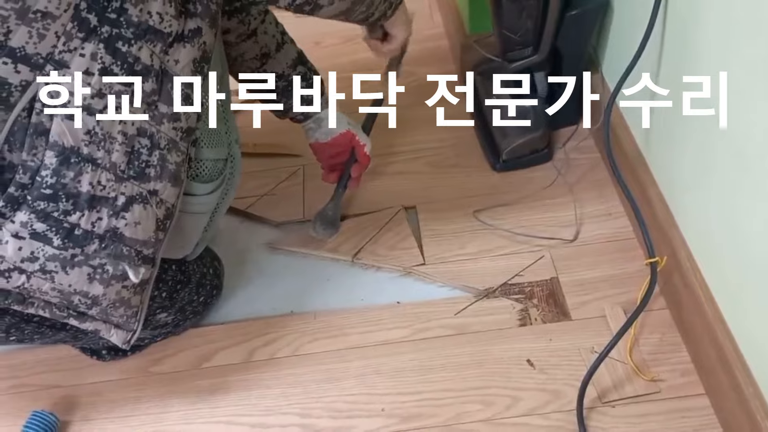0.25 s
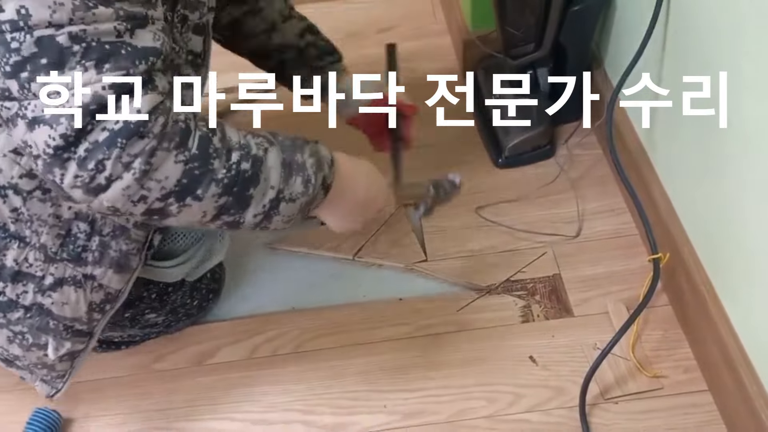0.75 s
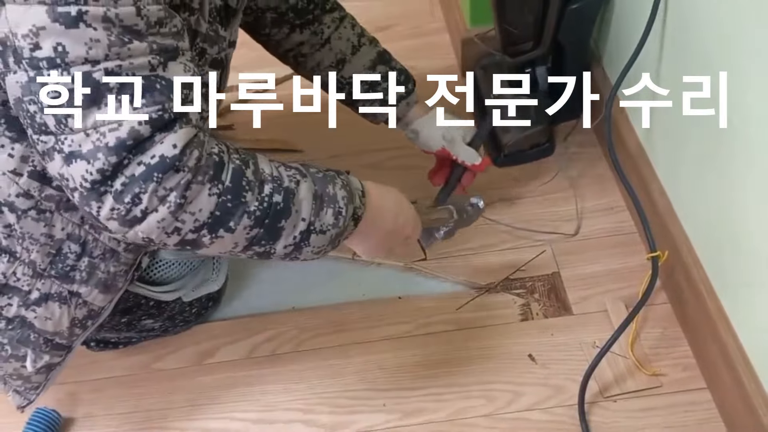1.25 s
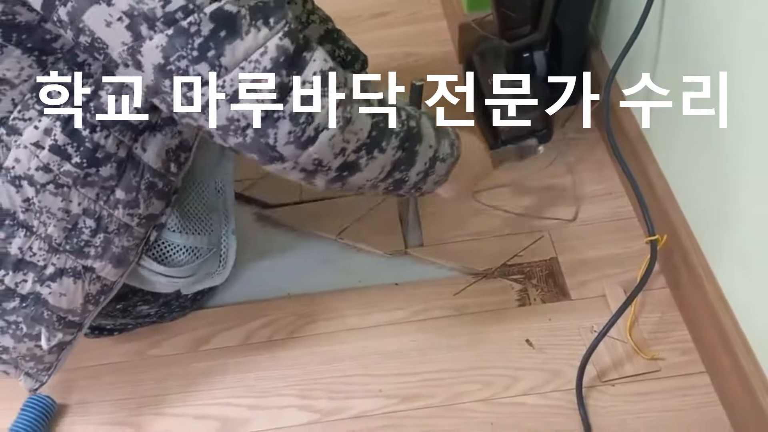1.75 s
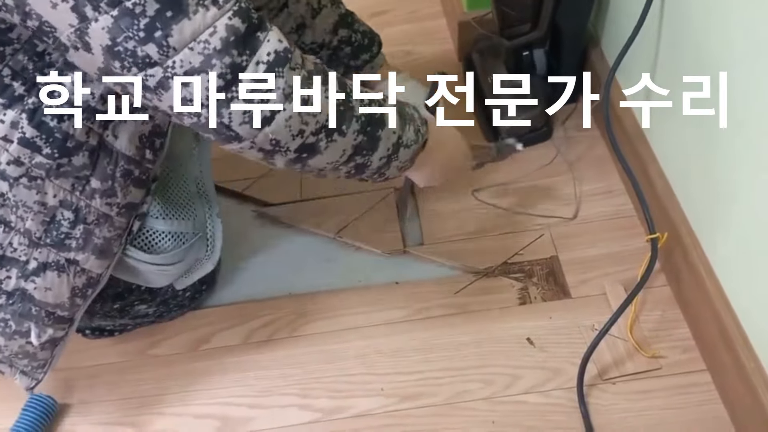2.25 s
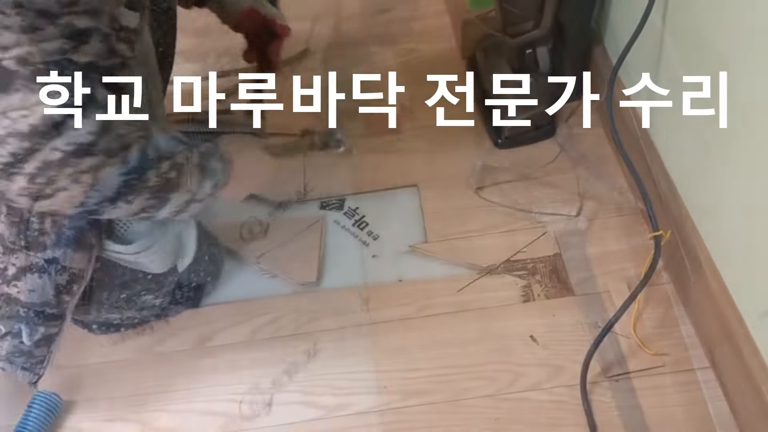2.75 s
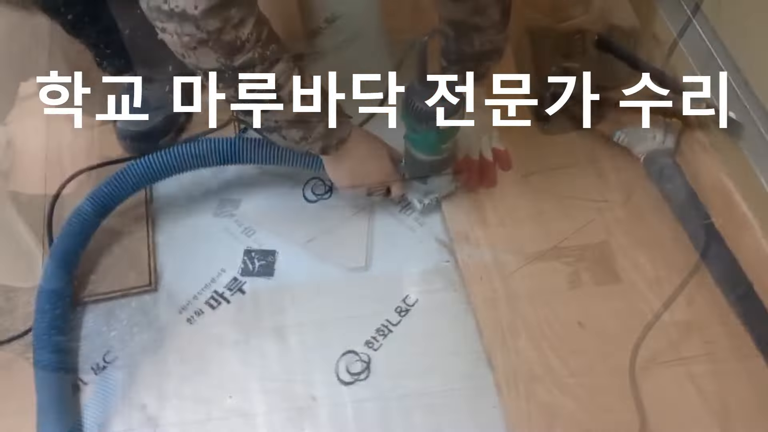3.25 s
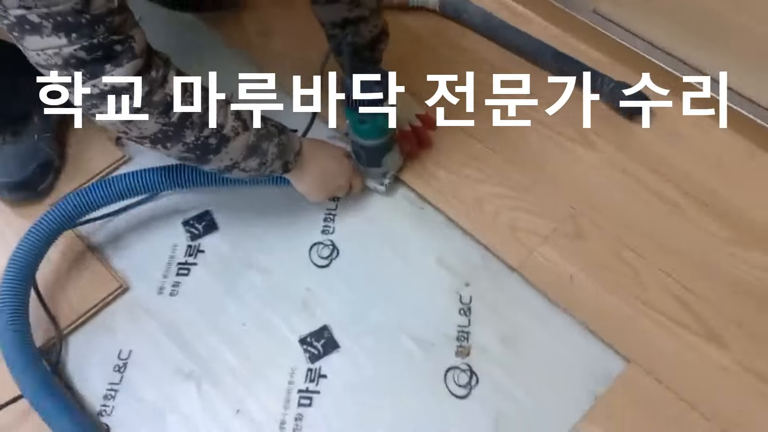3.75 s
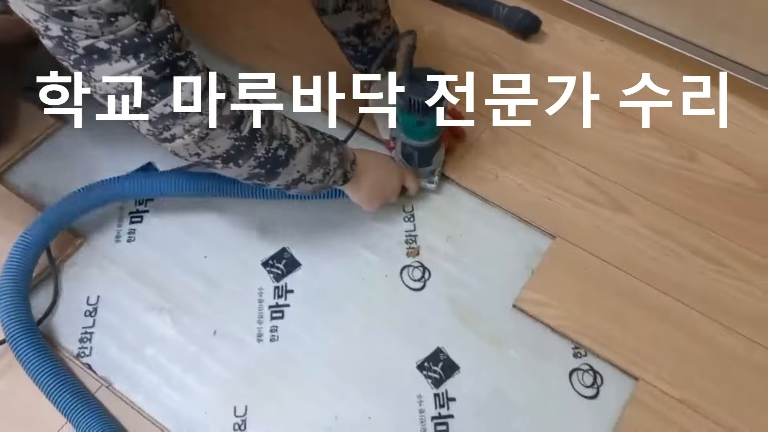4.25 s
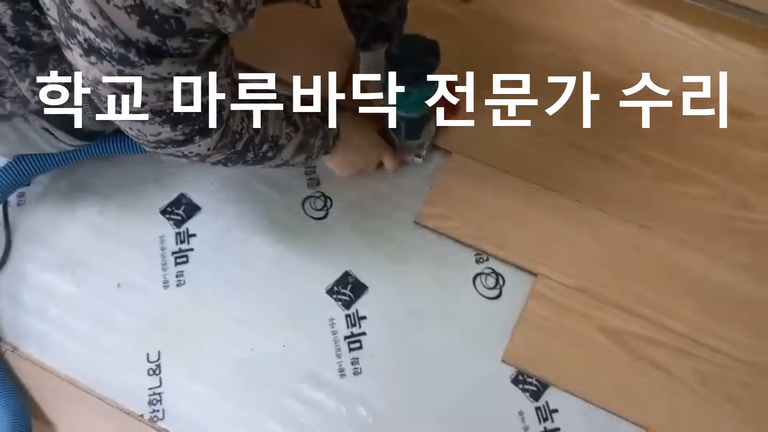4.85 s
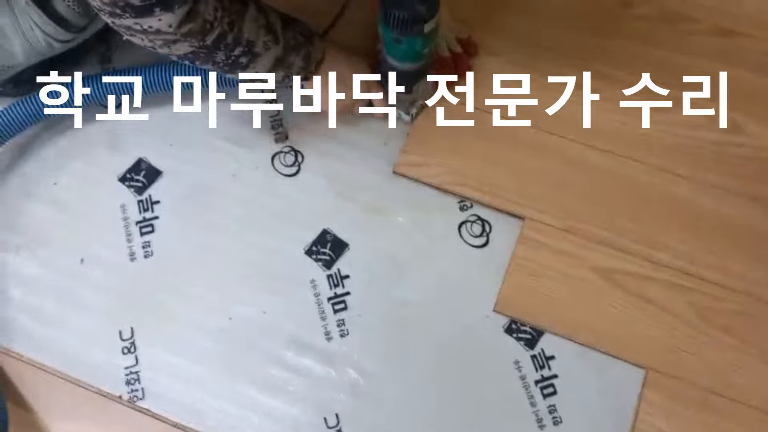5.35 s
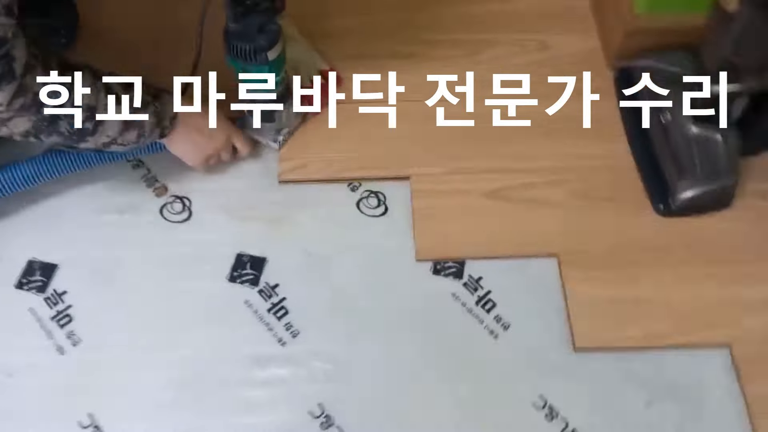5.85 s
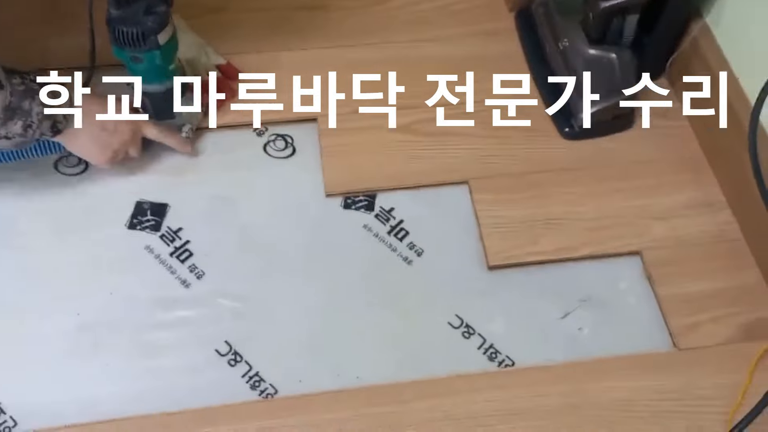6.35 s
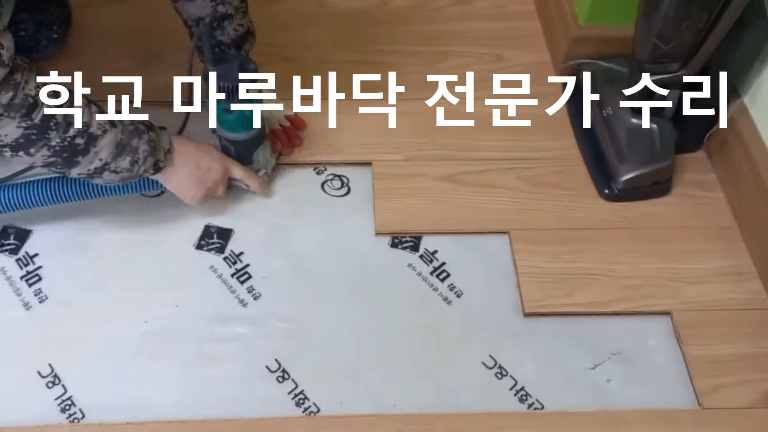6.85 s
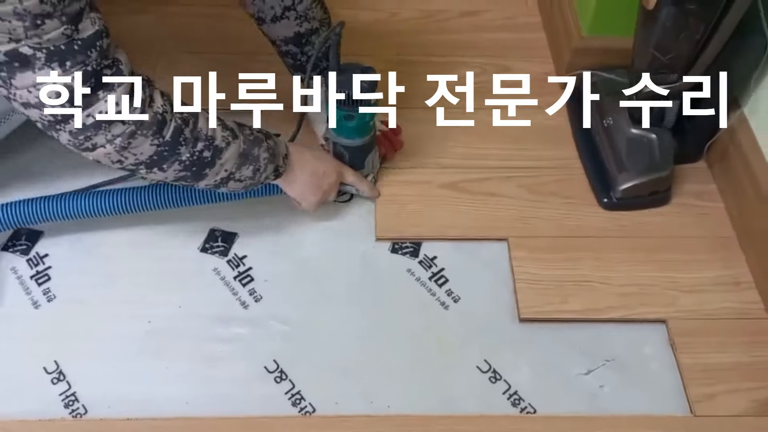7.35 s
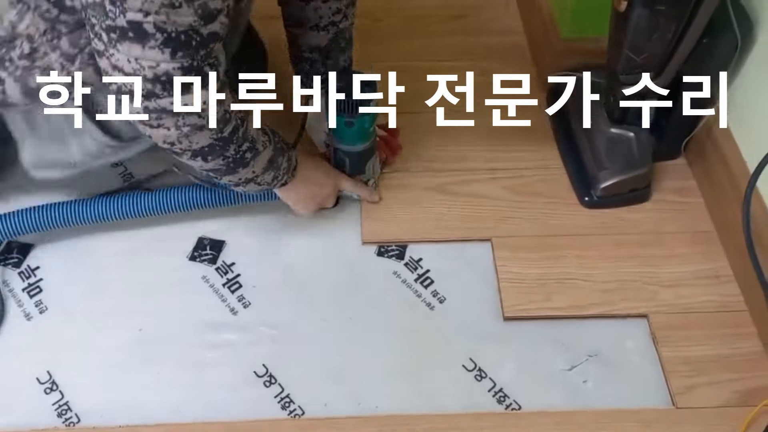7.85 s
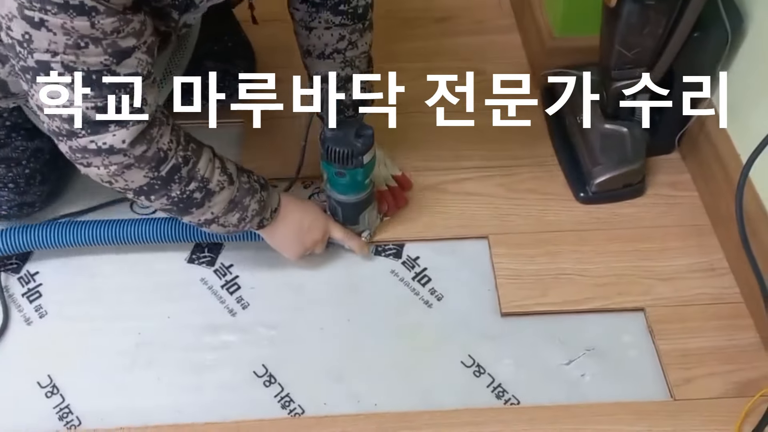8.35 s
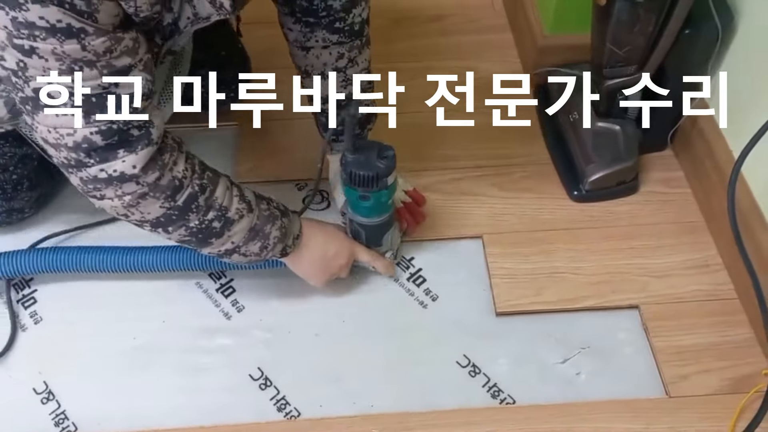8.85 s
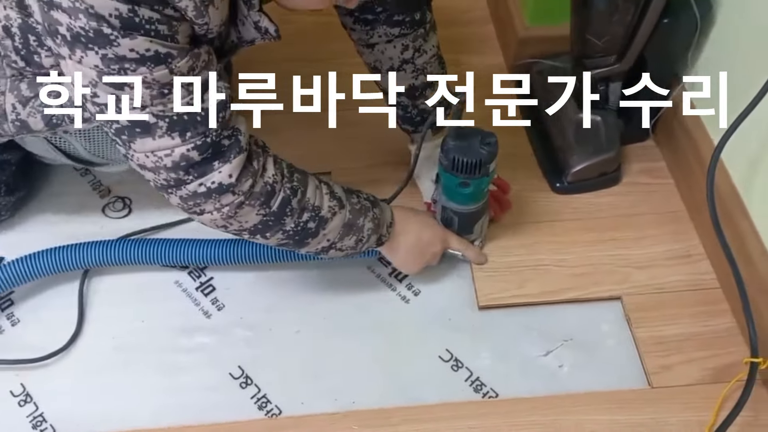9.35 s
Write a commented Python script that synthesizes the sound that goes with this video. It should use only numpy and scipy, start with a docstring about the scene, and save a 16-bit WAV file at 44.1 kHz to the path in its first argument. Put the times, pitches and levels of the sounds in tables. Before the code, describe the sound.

Close stereo sound in a bare indoor room with a short, bright echo. From 0 to 0.35 s a hammer hits a steel chisel in rapid, hard knocks, with dry wood crack and brief metallic ring, the hand tools leaning left. At 0.6 s the chisel edge ticks and scrapes sharply. From 0.9 to 1.45 s there is near silence with faint offcut knocks, sliding, and tiny steel squeaks. Loud prying cracks come at about 1.7, 1.9 and 2.4 s, woody with damped steel. From 2.6 s a trim router and vacuum fade in, reaching full level by 3.8 s. The router's nasal whine around 450 Hz wavers, sags under load and rises near 7 and 8.8 s, with shifting overtones and a fine bright cutting buzz. Steady vacuum hum and broad rushing air continue underneath until the cut-off near 9.6 s.

```python
"""Chisel, router and vacuum in a bare room

To the left a floor layer hammers a steel chisel into wooden boards, shifts the tool and prises pieces loose.
Each blow is a chattering contact that rings steel and boards; stick-slip noise makes the scrapes between.
Then a trim router and the vacuum cleaner on its hose fade in: shaft harmonics sag as the bit bites,
the cutter clicks once a turn, the motor hums, and banded noise makes the rushing air."""
import sys
import numpy as np
from scipy import signal
from scipy.fft import rfft, irfft, next_fast_len
from scipy.io import wavfile
from scipy.ndimage import uniform_filter1d

SR = 44100
rng = np.random.default_rng(int(sys.argv[2]) if len(sys.argv) > 2 else 0)


def transcribe(u):
    """Save the signal u as a 16-bit wav file named by the first command-line argument.

    u: samples, shape (n,) or (channels, n), limited to [-1, 1]; the rate is SR.
    q: integer samples, one column per channel.
    """
    v = np.clip(np.atleast_2d(u).T, -1, 1)
    q = np.round(v * 32767).astype(np.int16)
    wavfile.write(sys.argv[1], SR, q)


N = 423786
T = np.arange(N) / SR
STEP = 64  # samples between control points
RIGHT_LATE = 14  # samples by which machine noise reaches the right ear late

# resonances of loose wood: f/Hz, width/Hz, level/dB
OFFCUT = [(209, 55, 4.5), (328, 137, 0), (500, 260, 7), (800, 220, -8), (1115, 200, 4)]


def undb(db):
    """Gain of a dB value."""
    return 10 ** (np.asarray(db, float) / 20)


def unit(x):
    """Scaled to rms 1."""
    return x / np.sqrt(np.mean(x ** 2))


def unit_onset(x):
    """Scaled to rms 1 over the first 20 ms."""
    return x / np.sqrt(np.mean(x[:, :SR // 50] ** 2))


def columns(table, off=-200.):
    """Rows joined by straight lines in time; off outside, but a table reaching the end holds its last value."""
    s, *cols = np.transpose(table)
    reaches_end = s[-1] > T[-1] - .05
    return [np.interp(T, s, c, off, c[-1] if reaches_end else off) for c in cols]


def over_hz(table, size):
    """A (Hz, value) table on the bins of a transform, joined over log frequency."""
    hz, value = np.transpose(table)
    bins = np.fft.rfftfreq(size, 1 / SR)
    return np.interp(np.log(bins + 1), np.log(hz), value)


def colour(x, table):
    """Shaped by a (Hz, dB) spectrum."""
    size = x.shape[-1]
    return irfft(rfft(x) * undb(over_hz(table, size)), size)


def resonate(x, peaks):
    """Sum of band-passes (Hz, width Hz, dB)."""
    return sum(undb(db) * signal.lfilter(*signal.iirpeak(hz, hz / width, SR), x) for hz, width, db in peaks)


def ring(x, modes):
    """Decaying modes (Hz, dB, t60 s), each a one-pole complex resonator."""
    out = 0
    for hz, db, t60 in modes:
        pole = np.exp(2j * np.pi * hz / SR - np.log(1000) / (t60 * SR))
        out = out + undb(db) * signal.lfilter([1], [1, -pole], x).imag
    return out


def band(x, lo_hz, hi_hz):
    """Broad band-pass."""
    return signal.sosfilt(signal.butter(2, [lo_hz, hi_hz], "band", fs=SR, output="sos"), x)


def walk(rate, count=1):
    """Random levels held 1 / rate s and slewed twice, one value a control point; spread near 1."""
    hold, size = max(int(SR / STEP / rate), 1), N // STEP + 1
    steps = np.repeat(rng.standard_normal((count, size // hold + 1)), hold, axis=1)
    slewed = uniform_filter1d(uniform_filter1d(steps, hold), hold)
    return 1.432 * slewed[:, :size]


def smooth(control):
    """Control points joined up at the sample rate."""
    return np.array([np.interp(T, np.arange(len(c)) * STEP / SR, c) for c in control])


def pan(x, db):
    """Left louder than right by db."""
    return x * undb(np.array([db, -db]) / 2).reshape(2, -1)


def lean(x, table):
    """Left louder than right by a (Hz, dB) table, at the same power."""
    ratio = undb(over_hz(table, x.shape[-1]))
    same_power = np.sqrt(2 / (1 + ratio ** 2))
    return irfft(rfft(x) * np.array([ratio, ratio ** 0]) * same_power, x.shape[-1])


def ticks(table, cycles):
    """Knocks (s, dB, Hz) that swell for a few cycles and die."""
    out = np.zeros(N)
    for s, db, hz in table:
        turns = np.arange(2000) * hz / SR
        at = int(s * SR)
        swell = np.e * turns / cycles * np.exp(-turns / cycles)
        out[at:at + 2000] += undb(db) * swell * np.sin(2 * np.pi * turns)
    return out


def grains(spread_db):
    """Stick-slip noise: mostly small slips, a few large."""
    return rng.standard_normal((2, N)) * undb(spread_db * rng.exponential(size=N))


def hush():
    """Faint coloured hiss between the hand-tool sounds."""
    # rising and sinking: t/s, level/dB
    hush_level = [(.6, -100), (.8, -92), (.9, -100), (1.0, -84), (1.11, -92), (1.13, -104), (1.17, -87),
                  (1.5, -88), (1.7, -83.5), (2.2, -88), (2.3, -99), (2.4, -93), (2.7, -92)]
    # spectrum: f/Hz, level/dB per Hz
    hush_tint = [(18, -42), (30, -21), (60, -7.5), (93, -5.5), (152, -11), (382, -17.5), (483, -18.5),
                 (838, -22.5), (15800, -25)]
    hiss = unit(colour(rng.standard_normal((2, N)), hush_tint))
    return undb(columns(hush_level)[0]) * hiss


def air():
    """Half-octave bands of rushing air and chips that flicker alone; a shared part reaches the right ear late."""
    # rush and cutting noise: t/s, level/dB, rumble/dB and treble/dB beside the middle
    air_level = [(2.58, -35.5, -13, -1.5), (3.24, -37.5, -11.5, -2.5), (3.6, -35.5, -18, -2.5),
                 (3.9, -39, -16, -2), (4.7, -39.5, -15, -4), (5.5, -39.5, -15, -1.5),
                 (5.55, -35.5, -19, -5), (5.63, -38, -15.5, -4), (6.4, -39, -16, -4.5),
                 (6.55, -38, -16.5, -5), (7.26, -38, -16.5, -3.5), (7.9, -37.5, -15.5, -6.5),
                 (8.75, -38, -17, -4), (8.79, -35.5, -20, -7), (8.94, -37.5, -19.5, -1),
                 (9.61, -37.5, -14, -5.5)]
    # spectrum: f/Hz, level/dB per Hz
    air_tint = [(25, -23), (60, -9), (105, 4.5), (200, 0.5), (340, 0.5), (520, 2.5), (1000, 1.5), (1600, 2),
                (5200, -5), (7000, -7), (8000, -14), (12800, -6.5), (15800, -11)]
    # left-right likeness: f/Hz, share (0-1)
    likeness = [(60, 1), (150, 1), (300, 0.96), (700, 0.54), (1500, 0.4), (6000, .1), (15000, 0.04)]
    gust_db, rumble_swell_db, sway_db = .27, 1, .5
    db, rumble_db, treble_db = columns(air_level)
    gust, swell, sway = smooth(walk(10, count=3))
    size = next_fast_len(N)
    shared, alike = rng.standard_normal(size), np.clip(over_hz(likeness, size), 0, 1)
    hz = np.fft.rfftfreq(size, 1 / SR)
    # long waves arrive together
    late = np.exp(-2j * np.pi * hz * RIGHT_LATE / SR * np.clip(hz / 1800, 0, 1) ** 2)
    common = np.sqrt(alike) * rfft(shared) * np.array([late ** 0, late])
    separate = np.sqrt(1 - alike) * rfft(rng.standard_normal((2, size)))
    spectrum = (common + separate) * undb(over_hz(air_tint, size))
    octave, parts = np.log2(hz + 1), np.zeros((3, 2, N))  # rumble, middle, treble
    for centre in np.arange(4.5, 14.5, .5):
        share = np.clip(1 - abs(octave - centre) * 2, 0, 1)
        slow_db = 2.2 if centre < 7.2 else .6
        flicker = smooth(undb(slow_db * walk(12) + 1.6 * walk(50)))
        part = int(centre > 8.4) + int(centre > 12.9)
        parts[part] += irfft(spectrum * share, size)[:, :N] * flicker
    rumble, middle, treble = [unit(p) for p in parts]
    mix = undb(rumble_db + rumble_swell_db * swell) * rumble + middle + undb(treble_db) * treble
    return pan(undb(db + gust_db * gust) * mix, sway_db * sway)


def vacuum():
    """A steady motor hum and overtones whose standing waves shift between the ears."""
    # hum at the two ears: t/s, left level/dB, right level/dB, left leads right/rad
    hum_level = [(2.603, -15, -10, 0), (2.67, -27.5, -39, 1.2), (2.8, -50, -52, 1.3),
                 (2.97, -74, -41, 0.54), (3.12, -39, -63, 0.46), (3.35, -32, -34, 0.42),
                 (3.85, -41.5, -32.5, 0.57), (4.1, -46, -39, 0.93), (4.35, -35.5, -35, -0.78),
                 (4.85, -37, -34.5, 0.52), (5.1, -41, -37.5, -0.39), (5.35, -36, -31.5, 1.07),
                 (5.6, -47, -41, -1.8), (6.1, -33.5, -36, 0.56), (6.5, -32.5, -36.5, 0.38),
                 (7.1, -40.5, -42.5, 1.4), (7.6, -40, -38, 1.9), (7.85, -49, -36.5, -1.46),
                 (8.1, -43, -36, 0.95), (8.85, -44, -33.5, 0.66), (9.1, -47, -35, -0.25),
                 (9.35, -40, -34, 0.92), (9.61, -50, -34.5, -1.08)]
    # overtones of the hum: multiple, level/dB beside it
    hum_overtones = [(2, -19.5), (3, -21)]
    hum_hz = 424.3
    left_db, right_db, lead = columns(hum_level)
    speed = hum_hz * smooth(1 + 0.00354 * walk(20))[0]
    phase = 2 * np.pi * np.cumsum(speed) / SR + np.array([lead, -lead]) / 2
    hum = np.sin(phase)
    for k, db in hum_overtones:
        hum = hum + smooth(undb(db + 3.0 * walk(9.5, count=2))) * np.sin(k * phase)
    flicker = smooth(undb(0.6 * walk(30) + 0.4 * walk(15, count=2)))
    return np.sqrt(2) * undb(np.array([left_db, right_db])) * flicker * hum


def cutter(shaft):
    """The bit chops the wood: one sharp click a turn, a little uneven, its bright comb patchy at either ear."""
    # chopping: t/s, level/dB
    cut_level = [(2.6, -58), (3.8, -56), (4.1, -49), (4.35, -56), (4.65, -48), (4.95, -51), (5.3, -58),
                 (5.6, -51), (5.9, -46.5), (6.3, -52), (6.8, -49), (7.15, -54), (7.4, -47), (7.7, -44),
                 (8.0, -45), (8.35, -51), (8.6, -56), (8.85, -48), (9.1, -56), (9.61, -52)]
    jitter_s, scatter_db, patchy_db = 5e-6, 2, 4.5
    turns = shaft / (2 * np.pi)
    at = np.interp(np.arange(1, int(turns[-1]) - 1), turns, np.arange(N))
    chance = rng.standard_normal((N // 64, 2))[:len(at)].T
    at = at + jitter_s * SR * chance[0]
    # windowed sinc pulses place each click between samples
    taps = np.round(at)[:, None] + np.arange(-8, 9)
    pulses = np.sinc(taps - at[:, None]) * np.hanning(19)[1:-1]
    clicks = np.zeros(N)
    clicks[taps.astype(int)] = pulses * undb(scatter_db * chance[1])[:, None]
    clicks = np.array([clicks, np.roll(clicks, RIGHT_LATE)])
    comb = 0
    for hz in range(10500, 15500, 1000):
        comb = comb + smooth(undb(patchy_db * walk(14, count=2))) * band(clicks, hz, hz + 1000)
    return undb(columns(cut_level)[0]) * unit(comb)


def router():
    """Multiples of the shaft speed; each flickers and drifts differently at either ear as the tool moves."""
    # t/s, shaft f/Hz, shaft tone level/dB, judder/dB over the clean tone, bite/dB added to the overtones
    shaft_course = [(2.62, 460.6, -36, 6, 12.5), (2.85, 460.3, -37, -12, 4), (3.02, 452.3, -38.5, -27, 5),
                    (3.18, 453.7, -38.5, -15, -3.5), (3.4, 459, -47, 0, 4.5), (3.86, 460.2, -53, -2, 2.5),
                    (4.28, 448.2, -37.5, 10, 0), (4.45, 451, -43.5, 8, 4.5), (4.65, 451, -38, 5, -2),
                    (4.84, 450, -47, 1, 3.5), (5.06, 453.7, -52, 7, 0), (5.12, 457.3, -49, -14, -2),
                    (5.29, 445, -60, 2, 1.5), (5.45, 444.4, -55, 4, -4), (5.55, 437.7, -39, -4, -6),
                    (5.68, 447, -51, -4, 7), (5.96, 454.7, -41, -4, -1), (6.24, 450.2, -44, -0.5, 2.5),
                    (6.66, 466, -45, -7, -2), (6.94, 477, -47, 7, 2.5), (7.22, 446.8, -48, 13, 0.5),
                    (7.36, 438.2, -40.5, -7, 3), (7.52, 434.1, -44, -3, 4.5), (7.64, 438.1, -39, -16, 4.5),
                    (7.92, 463, -42.5, -7, 2.5), (8.06, 462.4, -39.5, -5, -2), (8.36, 455.6, -53, -5, 5),
                    (8.5, 457.3, -42, 1, -0.5), (8.64, 466.3, -47, 7, 2), (8.79, 476, -45.5, -7, -11),
                    (8.93, 475.5, -43, -4, 4), (9.0, 467, -39, -12, 0), (9.14, 460.4, -52, -11, -6),
                    (9.3, 466.3, -43.5, -4, 3.5), (9.45, 466, -36, -8, -13), (9.61, 471, -47, -22, -1)]
    # overtones of the shaft: {multiple: usual level/dB}
    usual_db = {2: -52.5, 3: -53.5, 4: -54.5, 5: -56.5, 6: -53.5, 7: -57.5, 8: -56.5, 9: -63.5, 10: -77, 11:
                -64, 12: -60, 18: -65, 24: -64, 26: -68, 27: -76, 30: -67}
    # moments when one overtone sings out: {multiple: [(middle t/s, length/s, level/dB)]}
    sing_outs = {2: [(2.97, 0.25, -54), (4.5, 0.29, -45.5), (4.84, 0.18, -43), (5.3, 0.5, -43.5),
                 (5.63, 0.23, -39.5), (6.5, 0.45, -45), (7.15, 0.41, -46), (8.34, .15, -49),
                 (9.32, 0.32, -47.5)], 3: [(4.52, 0.4, -47), (5.96, 0.3, -43.5), (6.62, 0.18, -46.5),
                 (6.97, 0.18, -40.5), (7.8, 0.21, -56), (8.1, 0.37, -46.5), (9.0, 0.4, -49),
                 (9.57, 0.094, -46.5)], 4: [(2.9, 0.74, -46), (3.55, 0.32, -38), (5.85, 0.59, -42.5),
                 (6.33, 0.34, -41), (7.6, 0.44, -38.5), (8.1, 0.24, -43.5)], 5: [(5.59, 0.16, -41.5),
                 (5.9, 0.19, -47), (7.88, 0.091, -48), (9.27, .12, -60)], 6: [(3.58, 0.53, -40),
                 (4.05, 0.24, -39), (4.56, 0.21, -48.5), (5.65, 0.54, -45), (6.9, 0.36, -52),
                 (7.35, 0.33, -43.5), (8.1, 0.33, -49), (8.84, 0.16, -41), (9.05, 0.26, -49)],
                 7: [(3.65, 0.27, -44), (5.7, 0.29, -48.5), (7.65, 0.12, -43.5), (8.1, 0.24, -50)],
                 8: [(6.9, 0.26, -60), (7.5, .25, -57), (7.87, 0.39, -42.5), (8.22, 0.43, -45.5),
                 (9.0, 0.14, -44)], 9: [(6.75, .3, -53), (7.8, 0.22, -49), (8.05, 0.2, -51.5)],
                 10: [(5.65, 0.11, -55), (7.75, 0.16, -45.5)], 11: [(5.62, 0.2, -55)], 12: [(3.7, 1, -52),
                 (4.87, 0.18, -47), (5.3, 0.49, -53.5), (5.55, 0.059, -46), (6.0, 0.61, -52.5),
                 (6.9, 0.24, -49), (7.4, 0.49, -50.5)], 18: [(3.0, 0.28, -66), (6.9, .4, -61),
                 (7.35, .25, -58)], 24: [(4.05, 0.13, -46), (6.85, .25, -59), (7.95, 0.16, -49)],
                 26: [(7.92, 0.15, -46)], 27: [(7.65, 0.24, -49)], 30: [(5.95, .3, -55), (7.95, 0.23, -53),
                 (8.9, .2, -55)]}
    wander_db, wander_per_s = 2, 5
    break_up_db = .13  # flicker added with each multiple
    hz, tone_db, judder_db, bite_db = columns(shaft_course)
    speed = np.maximum(hz, 0) * smooth(1 + 0.001553 * walk(60))[0]
    shaft = 2 * np.pi * np.cumsum(speed) / SR
    t, judder, out = T[::STEP], undb(judder_db[::STEP]), 0
    for k in [1, *usual_db]:
        if k == 1:
            gain = undb(tone_db[::STEP])
        else:
            gain = undb(usual_db[k] + bite_db[::STEP] + wander_db * walk(wander_per_s))
        for s, length, db in sing_outs.get(k, []):
            gain = np.hypot(gain, undb(db) * np.exp(-(2 * (t - s) / length) ** 4))
        flicker_db = 1.4 * walk(22) + .9 * walk(6, count=2) + break_up_db * k * walk(14, count=2)
        gain = gain * undb(flicker_db)
        # opposite phase drift at the two ears, rad
        apart = min(.25 * k, .6) * (1 + walk(4)) * np.array([[1], [-1]])
        share = judder * (1 if k == 1 else .45) + 0.024 * k  # high multiples blur more
        blur = walk(60 + 5 * k) + 1j * walk(60 + 5 * k)
        smear = (1 + share * blur) / np.sqrt(1 + 2 * share ** 2)
        drift = np.exp(1j * (0.57 * walk(6) + apart))
        envelope = smooth(np.sqrt(2) * gain * drift * smear)
        out = out + (envelope * np.exp(1j * k * shaft)).imag
    return out + cutter(shaft)


def fade():
    """Gain of the machines as they come in, a straight line."""
    from_s, to_s = 2.611, 3.774
    return np.clip((T - from_s) / (to_s - from_s), 0, 1)


def squeaks():
    """Steel tools rub: short thin tones that waver, with edges of a few milliseconds."""
    # start t/s, length/s, f/Hz, level/dB before flutter and panning
    rubs = [(.931, .05, 4200, -90), (.935, .045, 4600, -94), (.995, .065, 5830, -90),
            (1.008, .055, 4220, -87), (1.153, .025, 4240, -94), (1.225, .021, 4200, -79),
            (1.25, .026, 4270, -80)]
    edge_s, waver_share = .004, .0089
    waver, flutter = smooth(walk(120, count=2))
    out = 0
    for s, length, hz, db in rubs:
        gate = np.clip(np.minimum(T - s, s + length - T) / edge_s, 0, 1)
        tone = np.sin(2 * np.pi * hz * np.cumsum(1 + waver_share * waver) / SR)
        out = out + undb(db + 3.5 * flutter) * gate * tone
    return out


def shuffle():
    """Offcuts knock and slide on the floor; steel tools rattle and squeak faintly, further left."""
    # two bouts: t/s, level/dB before a 3 dB cut of the wood, rattle/dB beside that level
    bouts = [
        [(0.9, -103, -8), (0.924, -86, -36), (0.934, -55.5, -23), (0.968, -74, -24), (1.0, -73, -22),
         (1.03, -64, -17), (1.056, -69, -16), (1.072, -78, -30), (1.12, -103, -8)],
        [(1.14, -101, -12), (1.168, -70, -23), (1.214, -75, -15), (1.226, -66, -12), (1.26, -60.5, -11.5),
         (1.31, -73.5, -12), (1.35, -81, -10), (1.396, -103, 0), (1.414, -76, -15), (1.45, -103, -7)],
    ]
    # knocks: t/s, level/dB before panning, f/Hz
    offcut_knocks = [(0.931, -56, 540), (.932, -60, 1250), (1.036, -67, 1140), (1.207, -74, 600),
                     (.976, -70, 480), (1.003, -71, 500), (1.022, -68, 517), (1.047, -60, 458),
                     (1.165, -67, 464), (1.184, -64, 1050), (1.246, -58, 430), (1.257, -63, 337),
                     (1.416, -79, 560)]
    # steel rattle: f/Hz, width/Hz, level/dB
    rattle_peaks = [(2290, 350, -1), (3550, 140, -8)]
    db, rattle_db = columns(bouts[0] + bouts[1])
    slips = grains(1.2) * smooth(undb(2.0 * walk(90)))
    slide = unit(resonate(resonate(slips[0] + 0.5 * slips, OFFCUT), OFFCUT))
    wood = undb(db - 3.0) * slide + ticks(offcut_knocks, cycles=1.8)
    steel = undb(db + rattle_db) * unit(resonate(slips, rattle_peaks)) + squeaks()
    return pan(wood, 3.0) + pan(steel, 12.5)


def skid():
    """The chisel edge ticks and scrapes across a board: stick-slip noise through steel, wood and floor."""
    # t/s, level/dB, wood/dB and floor/dB beside the steel
    skid_level = [(0.59, -87, -5, -13), (0.596, -64, -22, -30), (0.608, -57, -17, -37),
                  (0.617, -55, -14, -28), (0.621, -48, -11, -20), (0.634, -41, -13.5, -16),
                  (0.645, -54.5, -13, -13), (0.712, -68, -10.5, -38), (0.76, -83, -11, -25),
                  (0.826, -100, -3, -10), (0.9, -106, -1, -3)]
    # ticks of the edge: t/s, level/dB before panning, f/Hz
    edge_ticks = [(0.597, -52, 5490), (0.6095, -33, 5170), (0.620, -43, 3200), (0.632, -55, 1290),
                  (0.6384, -42, 7000)]
    # spectrum of the steel scrape: f/Hz, level/dB per Hz
    scrape_tint = [(880, -57), (1500, -26), (2120, -12), (2530, -1.5), (4570, -7), (7180, 0), (8010, -15),
                   (14300, -7), (15800, -13)]
    db, wood_db, floor_db = columns(skid_level)
    slips = grains(1.3)
    steel = unit(colour(slips, scrape_tint))
    wood = unit(resonate(slips, OFFCUT))
    floor = unit(band(band(slips[:1], 30, 185), 30, 184))
    scrape = steel + undb(wood_db) * wood + undb(floor_db) * floor
    flicker = smooth(undb(1.8 * walk(120)))
    return pan(undb(db) * flicker * scrape + ticks(edge_ticks, cycles=1.1), 13.5)


def room(size, gap_s=0.016, bend_db=260):
    """Stereo echo tail, octave by octave; it dies ever faster as it fades."""
    # decay of the bare room, before the bend shortens it: f/Hz, t60/s
    decay = [(60, 0.91), (250, 0.35), (1000, 0.72), (3000, 0.67), (7000, 0.33), (15000, 0.28)]
    table_hz, table_t60 = np.transpose(decay)
    t, out = np.arange(size) / SR, 0
    for hz in 60 * 2. ** np.arange(9):
        t60 = np.interp(np.log(hz), np.log(table_hz), table_t60)
        noise = band(rng.standard_normal((2, size)), hz / 2 ** .5, min(hz * 2 ** .5, 20000.))
        out = out + noise * undb(-60 * t / t60)
    out = out * undb(-bend_db * t ** 2) * np.clip(t / gap_s, 0, 1)
    return out / np.sqrt(np.sum(out ** 2) / 2)


def blows(table, steel_modes, damp_db_s, wood_db, lean_db, steel_room_db):
    """Each blow is a chattering contact that cracks, rings steel and boards, and fills the room."""
    # the floor under every board, before scatter: f/Hz, width/Hz, level/dB
    board_peaks = [(290, 140, -6.5), (448, 130, 2.5), (1130, 80, 3), (2020, 80, -1.5), (2420, 120, -5),
                   (3630, 130, -7), (4200, 80, -7), (5900, 100, -9)]
    # the floor as a whole, passed twice: f/Hz, width/Hz, level/dB a pass
    thud_peaks = [(44.3, 33, -7.5), (96, 72, 2), (203, 150, -6)]
    # the room leans left too: f/Hz, left over right/dB
    room_lean = [(200, 1.5), (380, 6), (700, 3), (2380, 6.5), (4400, 10), (8120, 16), (15000, 11)]
    board_scatter_db, board_detune, steel_scatter_db = 2.5, .025, 2.5  # from blow to blow
    pair_ratio, pair_t60_s = 1.1, .16
    size, lead = int(.7 * SR), SR // 10  # the lead holds blows that fall before the start
    t, out = np.arange(size) / SR, np.zeros((2, N + lead + size))
    for s, blow_db, thud_db, treble_db, board_hz, sing_db, rise_ms, ms, steel_db, room_db in table:
        contact = np.clip(t * 1000 / rise_ms, 0, 1) ** 2 * np.exp(-(t * 1000 / ms) ** 4)
        chatter = rng.standard_normal((2, size)) * undb(1.8 * rng.standard_normal(size)) * contact
        spike, echo = np.eye(1, size), room(size)
        board = [(board_hz, 260, 0)]
        for hz, width, db in board_peaks:
            detune, scatter = rng.standard_normal(2)
            board.append((hz * (1 + board_detune * detune), width, db + board_scatter_db * scatter))
        # a loose piece sings as a close pair
        pair = [(board_hz, 0, pair_t60_s), (pair_ratio * board_hz, -2, pair_t60_s)]

        def knock(push):
            """Crack and wood, driven by a push."""
            crack = unit_onset(band(push, 1100, 6900)) * undb(-11.0)
            crack = crack + unit_onset(band(push, 4700, 17000)) * undb(treble_db)
            boards = unit_onset(resonate(push[:1], board))
            boards += 0.64 * unit_onset(band(push[:1], 150, 1800))
            boards += undb(sing_db) * unit_onset(ring(push[:1], pair))
            return crack + boards * undb(wood_db)

        thud = unit_onset(resonate(resonate(chatter[:1], thud_peaks), thud_peaks)) * undb(thud_db)
        scatter = rng.standard_normal(len(steel_modes))
        struck = np.array(steel_modes) + np.outer(scatter, [0, steel_scatter_db, 0])
        # the hand on the steel damps it
        steel = unit_onset(ring(chatter, struck)) * undb(steel_db - damp_db_s * t)
        # the room averages the chatter out and answers to the smooth colour of the knock
        sent = knock(spike) + undb(steel_room_db) * steel[:1]
        wet = signal.fftconvolve(sent, echo, axes=1)[:, :size]
        direct = lean(knock(chatter) + steel + thud, lean_db)
        at = int((s - .003) * SR) + lead  # contact starts 3 ms ahead of the listed time
        out[:, at:at + size] += undb(blow_db) * (direct + undb(room_db) * lean(wet, room_lean))
    return out[:, lead:lead + N]


def prise():
    """Pieces crack loose under the levered steel, which rings and is damped by the hand."""
    # t/s, blow level/dB, then beside it thud/dB, treble/dB, board f/Hz, board ring/dB before the wood gain,
    # rise/ms, contact/ms, steel ring/dB, room/dB
    cracks = [(1.721, -23.5, -20, -7, 800, -14, 2.9, 15, -10, -3),
              (1.764, -31.5, -38, -14, 449, -7, 6, 21, -10, -2.5),
              (1.897, -26.5, -29, -12.5, 2050, -14, 6.1, 30, -3, -2),
              (2.139, -66.5, -35, -13, 500, 1, 6.1, 20, -19, -11),
              (2.413, -25.5, -14, -7, 1016, -21, 5.7, 15, -3, -1),
              (2.44, -33, -40, -16, 1008, 3, 5, 14, -14, -5)]
    # levered steel, before scatter and damping: f/Hz, level/dB, t60/s
    bar_modes = [(2440, -11, .26), (3670, -1.5, .3), (4240, -12, .25), (4500, -20.5, .25),
                 (5820, -5.5, .15), (6800, -6.5, 0.085), (7430, -2, .12), (8380, 5, .06), (8900, -10, .2),
                 (10350, -7, .16), (11300, -8, 0.208), (11800, -10, .12), (13300, -13.5, .14),
                 (14320, -5, .17)]
    # the work lies to the left: f/Hz, left over right/dB
    prise_lean = [(60, 31), (110, 33), (200, 20), (380, 8), (2380, 10), (4400, 14), (8120, 21), (15000, 21)]
    return blows(cracks, bar_modes, damp_db_s=639, wood_db=-19.5, lean_db=prise_lean, steel_room_db=-9)


def hammer():
    """Hammer blows on the chisel drive steel into the board; both ring, and the room carries them on."""
    # t/s, blow level/dB, then beside it thud/dB, treble/dB, board f/Hz, board ring/dB before the wood gain,
    # rise/ms, contact/ms, steel ring/dB, room/dB
    strokes = [(-.09, -22.5, -35.5, -18.5, 990, -14, 4.2, 11, -13, -11),
               (.046, -24, -22, -10.5, 1240, -13, 8.1, 11, -1.5, -5.5),
               (.185, -26, -24, -13.5, 1160, -11, 4.2, 13.3, -2.5, -3),
               (.283, -45, -38.5, -17.5, 1100, -8.5, 3, 10, -10, -9),
               (.324, -26.5, -21, -12, 1164, -13, 5, 14.3, -1.5, -1.5)]
    # chisel steel, before scatter and damping: f/Hz, level/dB, t60/s
    chisel_modes = [(4000, -17, 0.35), (7030, 4, 0.088), (8300, -25.5, 0.59), (10200, -13.5, 0.59),
                    (11800, -6, 0.18), (12700, -18.5, 0.15), (13250, -26, 0.15), (13900, -13.5, 0.23)]
    # the work lies to the left; thud and treble lean that way most: f/Hz, left over right/dB
    hammer_lean = [(60, 16.5), (110, 12.5), (200, 2.5), (1290, -2.5), (2380, 2), (4400, 10.5), (8120, 21),
                   (15000, 21.5)]
    return blows(strokes, chisel_modes, damp_db_s=639, wood_db=-12.5, lean_db=hammer_lean, steel_room_db=-3)


def scene():
    """Hand tools first, then the machines fading in."""
    machines = fade() * (air() + vacuum() + router())
    hand_tools = shuffle() + skid() + prise() + hammer()
    return hush() + machines + hand_tools


def record(dry):
    """The phone rounds the loudest peaks and cuts the top."""
    top_hz, ceiling = 15750, .24
    rounded = ceiling * np.tanh(dry / ceiling)
    return signal.sosfilt(signal.ellip(10, .2, 75, top_hz, fs=SR, output="sos"), rounded)


dry = scene()
out = record(dry)
transcribe(out)
```